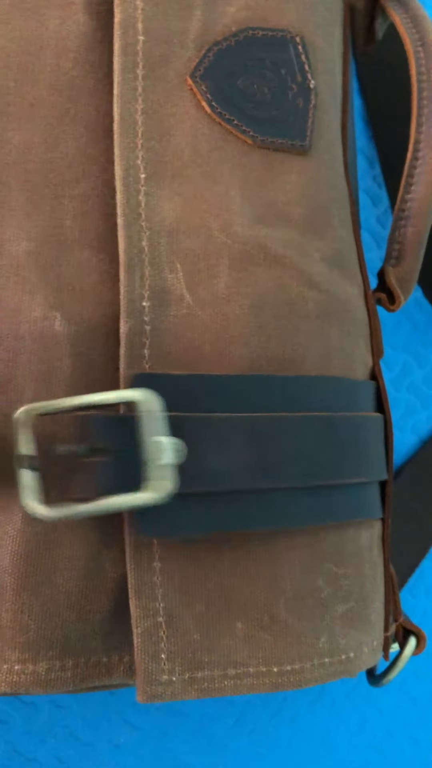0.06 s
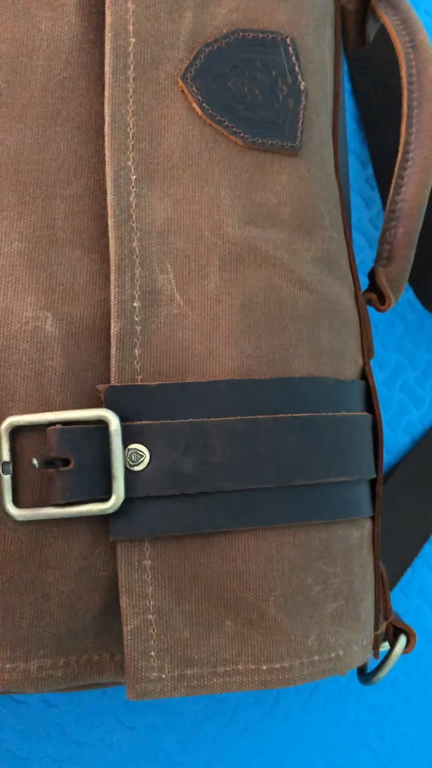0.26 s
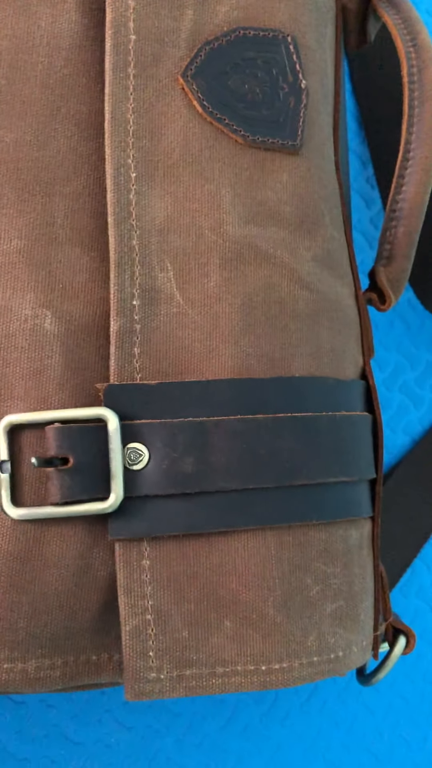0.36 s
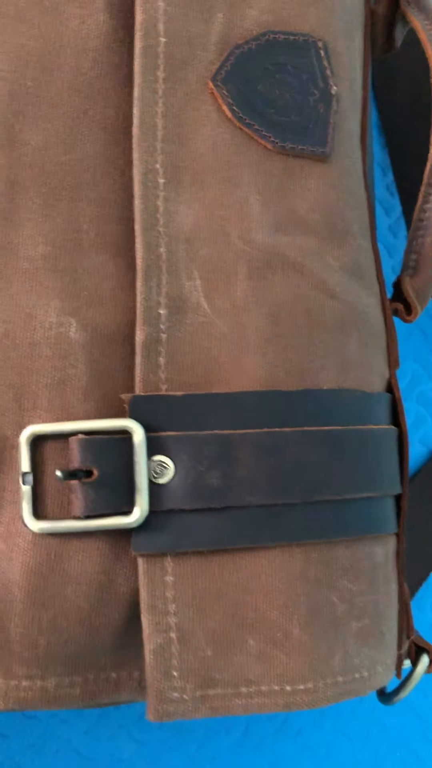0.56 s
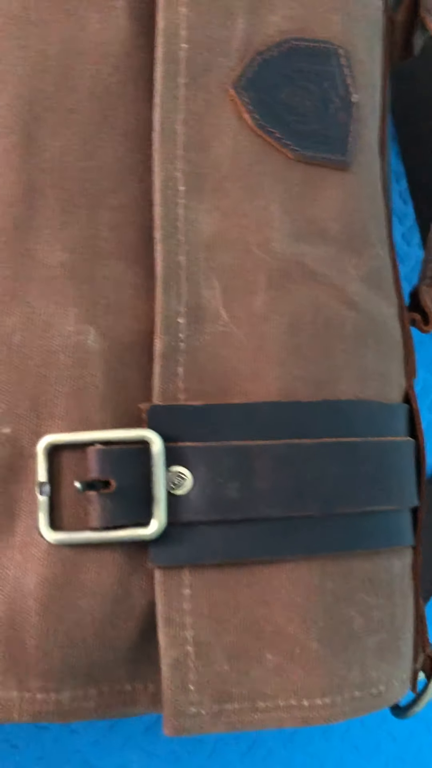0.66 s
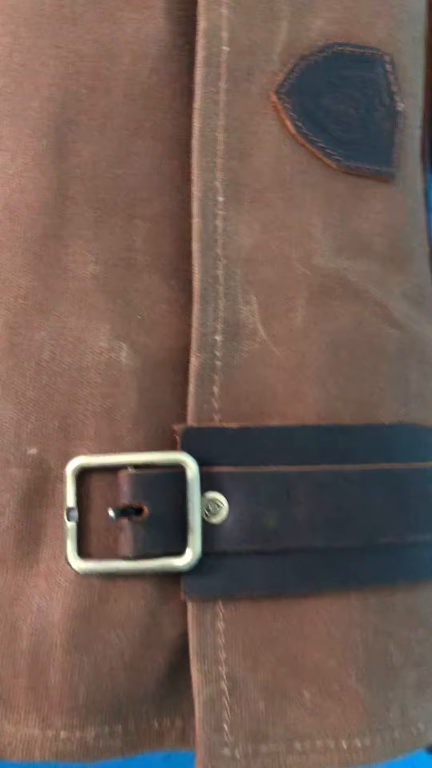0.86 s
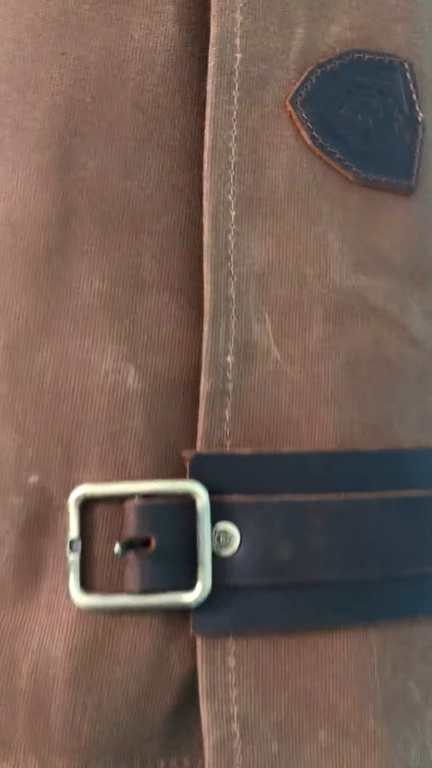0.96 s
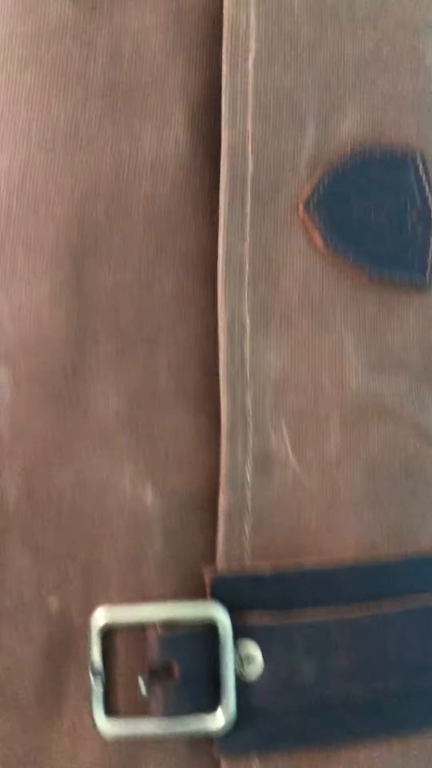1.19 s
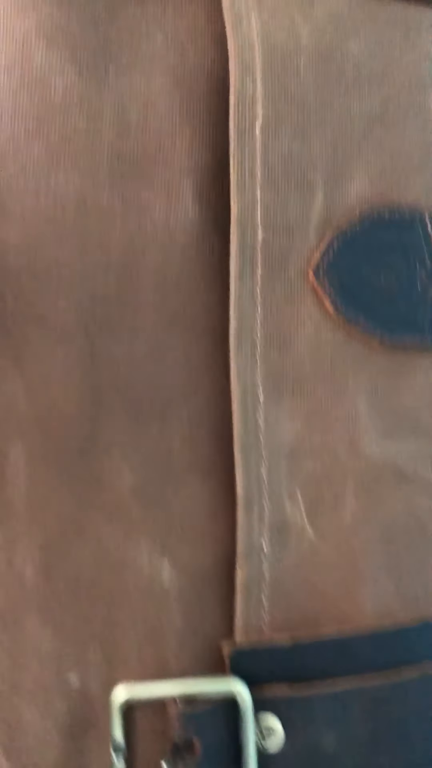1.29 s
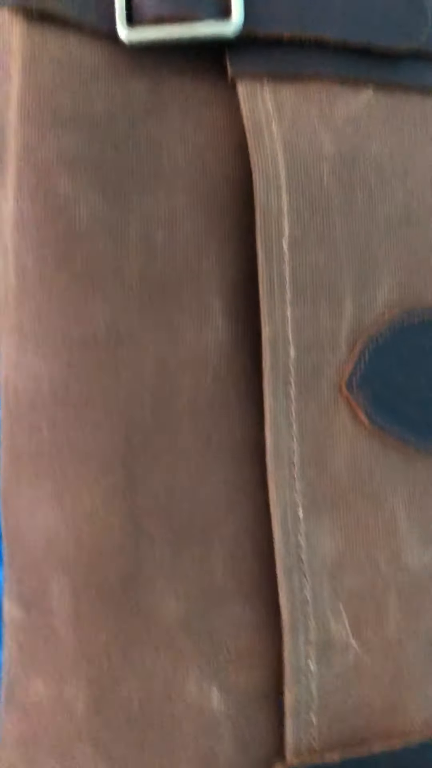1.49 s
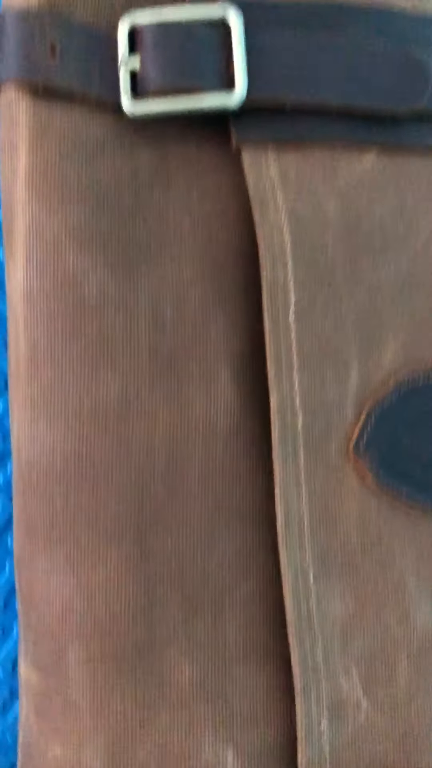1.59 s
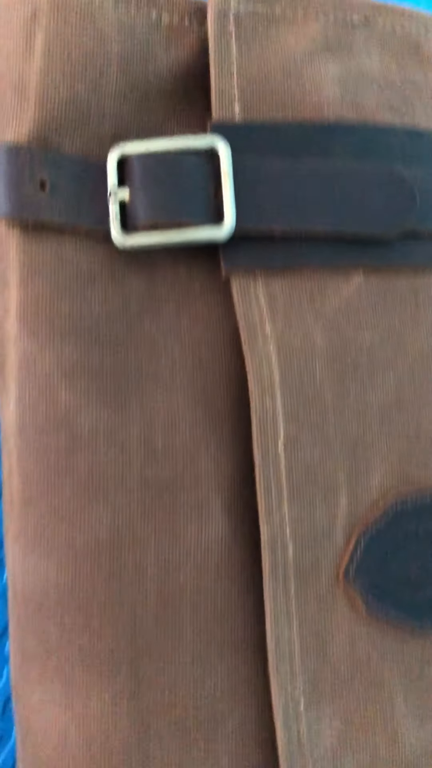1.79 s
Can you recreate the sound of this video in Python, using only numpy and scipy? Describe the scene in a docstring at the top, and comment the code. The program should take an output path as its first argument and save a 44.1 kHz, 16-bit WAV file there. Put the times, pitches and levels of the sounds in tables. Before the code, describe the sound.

Metal buckle tinkling and clacking against a bag, followed by faint leather and canvas rubbing.

```python
"""A small room with a low mains hum; one microphone close to a canvas bag.
A metal buckle is let go: its leather strap slides and the prong tinkles against the frame.
At 0.22 s the frame clacks down, thuds on the padded bag and rings faintly; a lighter clack follows.
From 0.5 s the leather creaks as it slips and catches, and the canvas softly brushes and sags."""
import sys
import numpy as np
from scipy import signal
from scipy.fft import rfft, irfft
from scipy.io import wavfile

SR = 44100
rng = np.random.default_rng(int(sys.argv[2]) if len(sys.argv) > 2 else 0)


def log_audio(samples):
    """Write samples as a 16-bit WAV file to the path given in sys.argv[1]."""
    # one column per channel
    frames = np.atleast_2d(samples).T
    # limit to full scale, then quantise
    limited = np.clip(frames, -1, 1)
    pcm = np.round(limited * 32767).astype(np.int16)
    wavfile.write(sys.argv[1], SR, pcm)


N = 81585

# mains hum: (frequency [Hz], rms level [dB])
HUM_TONES = [(60, -71), (120, -64)]
# rumble and hiss of the room: (frequency [Hz], relative level [dB])
AIR_SPECTRUM = [(20, -39), (40, -11.5), (60, -1.5), (90, -7), (136, -9), (180, -11), (300, -13),
                (490, -18.5), (650, -23.5), (1240, -27.5), (1700, -31), (5000, -32), (17000, -35.5)]
AIR_RMS_DB, HUM_WAVER = -65.5, 0.2
# room decay: (frequency [Hz], t60 [s])
ROOM_DECAY = [(100, 0.34), (260, 0.28), (700, 0.46), (1800, .48), (5000, 0.77), (9000, .33), (11500, .2),
              (16000, .2)]
# strength of the room's tail: (frequency [Hz], gain [dB])
ROOM_GAIN = [(80, -17), (170, -7.5), (350, -9), (700, -9.5), (1300, -8), (2500, -12), (5500, -16.5),
             (9000, -14), (11500, -19), (16000, -13.5)]
ROOM_DELAY_S, ROOM_BUILD_S = 0.001, 0.008

# canvas brushing: (peak time [s], level [dB], rise [s], fade [s])
CANVAS_BRUSHES = [(.86, -66, 0.044, 0.073), (0.965, -58, 0.011, 0.018), (0.996, -55, 0.013, 0.048),
                  (1.517, -61.5, 0.024, .055), (1.70, -62.5, 0.013, 0.064)]
# its colour: (frequency [Hz], relative level [dB])
BRUSH_SPECTRUM = [(100, -7), (350, -5), (1000, 2.5), (2500, -0.5), (8000, -1.5), (12000, -5), (17000, -6),
                  (18000, -27)]
# canvas sagging: (peak time [s], level [dB], rise [s], fade [s], boosted frequency [Hz])
CANVAS_SAGS = [(0.077, -61, 0.014, 0.022, 150.4), (0.129, -54.5, .004, 0.0063, 157),
               (0.286, -49, 0.045, 0.06, 68.6), (.575, -54, 0.0051, 0.015, 130),
               (.88, -57, 0.0076, 0.015, 130), (0.997, -56.5, 0.0042, 0.017, 723)]
# its colour: (frequency [Hz], relative level [dB])
SAG_SPECTRUM = [(30, -3.5), (150, 10), (1200, -8), (4000, -25)]
# leather catching: (time [s], level [dB], boosted frequency [Hz], boost [dB], fade [s])
LEATHER_CREAKS = [(0.4872, -52, 5930, 5.5, 0.0072), (0.5012, -48.5, 2780, 5, 0.0011),
                  (0.509, -48, 500, 17, 0.0049), (0.5451, -47.5, 1700, 8.5, 0.0055),
                  (0.5718, -54.5, 2260, 3, .005), (.8822, -57, 2600, 3, 0.0021),
                  (0.9849, -42, 8600, 7, 0.0011), (1.3021, -59, 9050, 15, .002),
                  (1.5084, -50.5, 4390, 13, 0.00078), (1.5698, -52, 4400, 4.5, 0.0045)]
# strap sliding: (peak time [s], level [dB], rise [s], fade [s], boosted frequency [Hz], boost [dB])
STRAP_RUBS = [(0.028, -62, 0.025, 0.11, 5400, 7.5), (.13, -64.5, .03, 0.24, 4750, 10.5),
              (.515, -59.5, 0.034, 0.051, 2860, 1.5), (0.573, -60, 0.023, 0.051, 1944, 9.5),
              (.875, -70.5, 0.064, 0.065, 7100, 14), (.925, -67.5, 0.012, .02, 2500, 8),
              (1.505, -66, .02, 0.035, 4470, 26), (1.588, -60.5, 0.021, 0.066, 4640, 4.5)]
# colour of both: (frequency [Hz], relative level [dB])
LEATHER_SPECTRUM = [(100, -4), (600, 0), (1700, -1), (3000, 0.5), (5300, -3.5), (7500, -11.5), (17000, -31)]
GRAIN_DB, GRAIN_S = 3, 0.0006  # unevenness of friction

# the buckle's weight landing on the bag: (time [s], gain [dB])
BAG_THUDS = [(0.2213, -7.5), (0.2228, 3.5), (0.3223, -18)]
# the padded bag: (frequency [Hz], level [dB], t60 [s])
BAG_MODES = [(145, -48.5, 1), (225.6, -42, 0.63), (257.7, -21.5, .03), (387, -19, 0.027),
             (471, -21.5, .025), (571.2, -30.5, 0.066), (650, -17, 0.021), (756, -28.5, .02),
             (990, -29, 0.032), (1115, -26, 0.035), (1280, -22, .016), (1792, -34.5, .025),
             (2400, -37, 0.005)]
# prong touching the frame: (time [s], gain [dB], most excited frequency [Hz], boost [dB])
PRONG_TINKS = [(.0573, 0.5, 10930, 4.5), (.1745, -16, 6500, 1.5), (.2003, -8, 8000, 16),
               (.2388, -9.5, 15300, 24), (0.3216, -1.5, 10000, 13.5), (0.3233, -2.5, 16550, 11.5)]
# the prong: (frequency [Hz], level [dB], t60 [s])
PRONG_MODES = [(6700, -52, .012), (8030, -50, .014), (10200, -45, .007), (10850, -40, .014),
               (11470, -40, .05), (14600, -43, .009), (15330, -43, .02), (15800, -44, .011),
               (16550, -42, .014)]
TINK_WIDTH_HZ, CHATTER_DEPTH, CHATTER_S = 600, 0.3, 0.0015
# what sets the frame ringing, first the sliding strap, then blows: (time [s], gain [dB], tilt [dB/kHz])
FRAME_EXCITATIONS = [(.01, -5, -2.5), (.0573, 0.5, -2), (.2286, -7, 1)]
# the frame: (frequency [Hz], level [dB], t60 [s])
FRAME_MODES = [(2248, -62, .9), (2810, -70, .6), (4400, -67, .6), (4525, -57, .3), (5788, -55, .25),
               (11465, -58, .22), (12842, -64, .36)]
# frame striking the strap: (time [s], gain [dB], boosted frequency [Hz], boost [dB], thud gain [dB])
FRAME_CLACKS = [(0.0507, -29, 5200, 13, -32), (0.1212, -36.5, 1900, 8.5, -46.5),
                (0.2197, -7.5, 4070, 12, -36), (0.2203, -2, 2350, 11.5, -22), (0.2283, -4, 5585, 13, -21),
                (0.3185, -25, 5200, 14.5, -50), (0.3186, -24, 5000, 15, -41)]
# colour of a clack: (frequency [Hz], gain [dB])
CLACK_SPECTRUM = [(100, -32.5), (500, -2.5), (1000, 6), (2500, -1), (3700, -0.5), (7000, -2), (9000, -5.5),
                  (11000, -9.5), (12500, -22), (16300, -7.5), (19000, -45.5)]
SCRAPE_DB, SCRAPE_S = -5.5, 0.0019
SOFT_CUTOFF_HZ, RECORDER_CUTOFF_HZ = 17300, 19200


def amp(db):
    """Decibels to gain."""
    return 10 ** (np.asarray(db) / 20)


def unit(x):
    """Scales to rms 1."""
    return x / np.sqrt(np.mean(x ** 2) + 1e-20)


def read(points, hz):
    """Reads a table on a log-frequency axis."""
    f, value = np.transpose(points)
    return np.interp(np.log(hz + 1), np.log(f + 1), value)


def add(mix, s, sound):
    """Mixes a sound in at time s."""
    part = mix[round(s * SR):][:len(sound)]
    part += sound[:len(part)]


def colour(points, size, boost_hz=1000, boost_db=0, width_octaves=0.29):
    """Gain per frequency bin, with one broad emphasis."""
    hz = np.fft.rfftfreq(size, 1 / SR)
    octaves = np.log2((hz + 1) / boost_hz)
    return amp(read(points, hz) + boost_db * np.exp(-.5 * (octaves / width_octaves) ** 2))


def drift(seconds):
    """Smooth random wander of rms 1."""
    hz = np.fft.rfftfreq(N, 1 / SR)
    return unit(irfft(rfft(rng.standard_normal(N)) * np.exp(-(hz * seconds) ** 2), N))


def lowpass(x, hz):
    """Steep low-pass."""
    return signal.oaconvolve(x, signal.firwin(511, hz, window=("kaiser", 9), fs=SR), "same")


def ring(modes, rise_s=0.0001):
    """Dying sines after one blow."""
    t = np.arange(SR) / SR
    tones = sum(amp(db - 60 * t / t60) * np.sin(2 * np.pi * hz * t) for hz, db, t60 in modes)
    return (1 - np.exp(-t / rise_s)) * tones


def click(gain):
    """The sharpest causal click with this spectrum."""
    log_gain = np.log(np.r_[gain, gain[-2:0:-1]] + 1e-6)
    return np.fft.ifft(np.exp(np.conj(signal.hilbert(log_gain)))).real[:len(gain)]


def friction(s, db, spectrum, rise_s, fade_s):
    """Tiny uneven slips, coloured by the material, swell to a peak at s and die away."""
    t = np.arange(N) / SR - s
    swell = np.exp(-np.where(t < 0, .5 * (t / rise_s) ** 2, t / fade_s))
    slips = rng.standard_normal(N) * amp(GRAIN_DB * drift(GRAIN_S))
    return amp(db) * swell * unit(irfft(rfft(slips) * spectrum, N))


def room_tone():
    """Wavering mains hum over low rumble and hiss."""
    t = np.arange(N) / SR
    hum = np.zeros(N)
    for hz, db in HUM_TONES:
        waver = 1 + HUM_WAVER * drift(0.12)
        hum += amp(db) * np.sqrt(2) * waver * np.sin(2 * np.pi * (hz * t + rng.random()))
    air = irfft(rfft(rng.standard_normal(N)) * colour(AIR_SPECTRUM, N), N)
    return hum + amp(AIR_RMS_DB) * unit(air)


def room_reverb(x):
    """Nearby walls return a diffuse tail that builds quickly and dies band by band."""
    hz, t, bands = signal.stft(rng.standard_normal(SR), SR, nperseg=256)
    t60 = read(ROOM_DECAY, hz)[:, None]
    bands *= amp(read(ROOM_GAIN, hz)[:, None] - 60 * t / t60)
    bands *= np.sqrt(2 * np.log(1000) / (t60 * SR))  # energy independent of decay time
    tail = signal.istft(bands, SR, nperseg=256)[1][:SR]
    tail *= np.clip((np.arange(SR) / SR - ROOM_DELAY_S) / ROOM_BUILD_S, 0, 1)
    return signal.fftconvolve(x, tail)[:N]


def canvas():
    """The cloth brushes with a hiss and sags with a low rustle."""
    out = np.zeros(N)
    for s, db, rise, fade in CANVAS_BRUSHES:
        out += friction(s, db, colour(BRUSH_SPECTRUM, N), rise, fade)
    for s, db, rise, fade, hz in CANVAS_SAGS:
        out += friction(s, db, colour(SAG_SPECTRUM, N, hz, boost_db=7), rise, fade)
    return out


def leather():
    """The strap catches in short creaks and slides in longer rubs."""
    out = np.zeros(N)
    for s, db, hz, boost_db, fade in LEATHER_CREAKS:
        out += friction(s, db, colour(LEATHER_SPECTRUM, N, hz, boost_db), rise_s=0.00021, fade_s=fade)
    for s, db, rise, fade, hz, boost_db in STRAP_RUBS:
        out += friction(s, db, colour(LEATHER_SPECTRUM, N, hz, boost_db), rise, fade)
    return out


def bag_thuds():
    """The padded bag thuds under each clack and under the buckle's weight."""
    out = np.zeros(N)
    low_cut = signal.butter(4, 176, "high", fs=SR, output="sos")
    thud = signal.sosfilt(low_cut, ring(BAG_MODES, rise_s=0.00044))
    for s, *_, db in FRAME_CLACKS + BAG_THUDS:  # the last column is the thud's gain
        add(out, s, amp(db) * thud)
    return out


def prong():
    """Each touch rings the prong's high modes, which buzz against the frame."""
    out = np.zeros(N)
    for s, db, hz, boost_db in PRONG_TINKS:
        modes = [(f, level + boost_db * np.exp(-.5 * ((f - hz) / TINK_WIDTH_HZ) ** 2), t60)
                 for f, level, t60 in PRONG_MODES]
        chatter = 1 + CHATTER_DEPTH * drift(CHATTER_S)[:SR]
        add(out, s, amp(db) * ring(modes, rise_s=0.00032) * chatter)
    return out


def frame_ring():
    """The metal frame rings on faintly, stirred by the sliding strap and by blows."""
    out = np.zeros(N)
    for s, db, tilt in FRAME_EXCITATIONS:
        modes = [(f, level + tilt * f / 1000, t60) for f, level, t60 in FRAME_MODES]
        add(out, s, amp(db) * ring(modes))
    return out


def frame_clacks():
    """The frame strikes the strap: one sharp contact, then a brief skid."""
    out = np.zeros(N)
    t = np.arange(2048) / SR
    skid_fade = np.exp(-t / SCRAPE_S) * np.sqrt(2 / (SCRAPE_S * SR))  # unit energy
    for s, db, hz, boost_db, _ in FRAME_CLACKS:
        force = (t == 0) + amp(SCRAPE_DB) * skid_fade * rng.standard_normal(len(t))
        response = click(colour(CLACK_SPECTRUM, len(t), hz, boost_db))
        add(out, s, amp(db) * signal.fftconvolve(force, response))
    return out


def scene():
    """Buckle and bag close to the microphone, the small room around them."""
    impacts = frame_clacks() + bag_thuds() + prong() + frame_ring()
    rustle = leather() + canvas()
    soft = rustle + room_reverb(impacts + rustle) + room_tone()
    return (impacts + lowpass(soft, SOFT_CUTOFF_HZ))[None]


def record(dry):
    """One channel, through the recorder's band limit."""
    return lowpass(dry[0], RECORDER_CUTOFF_HZ)[None]


dry = scene()
out = record(dry)
log_audio(out)
```